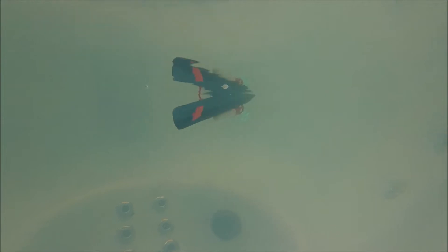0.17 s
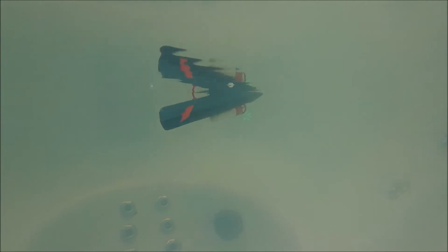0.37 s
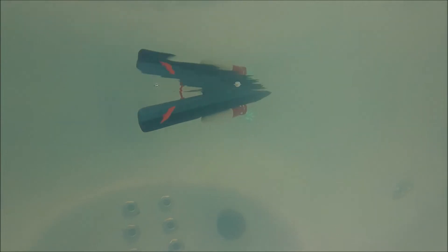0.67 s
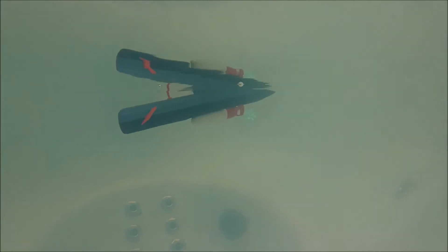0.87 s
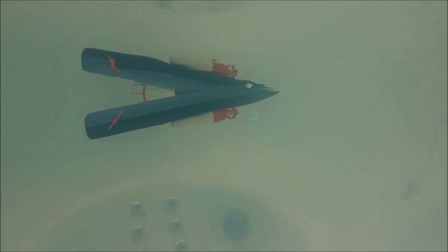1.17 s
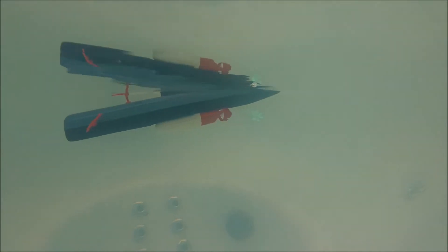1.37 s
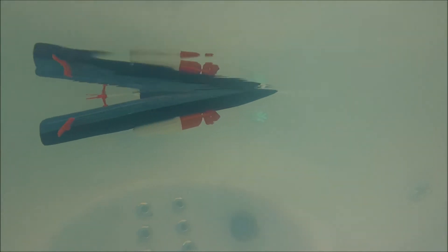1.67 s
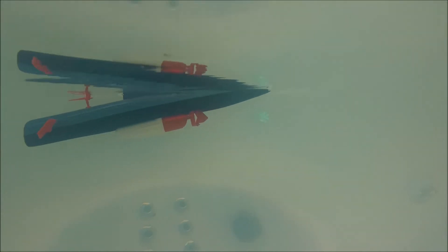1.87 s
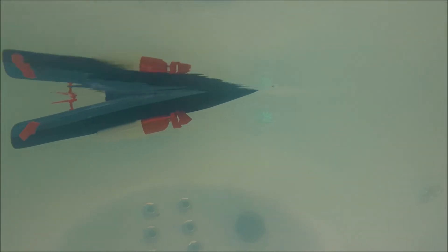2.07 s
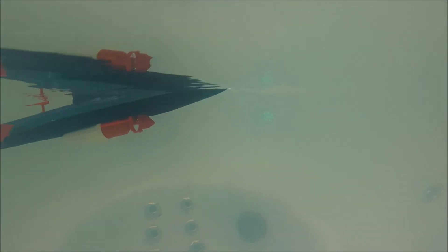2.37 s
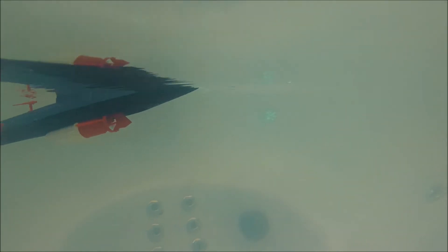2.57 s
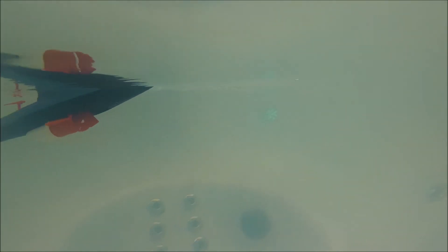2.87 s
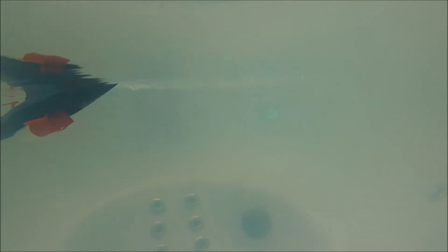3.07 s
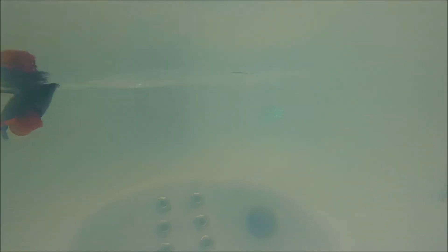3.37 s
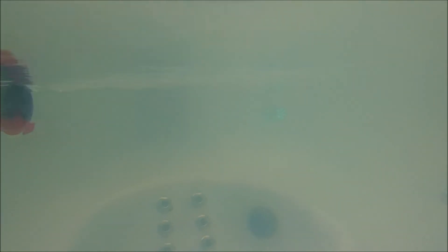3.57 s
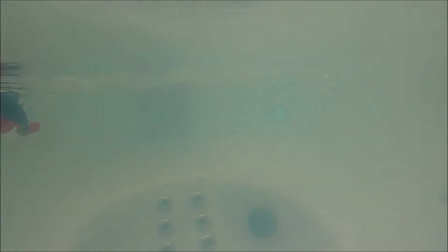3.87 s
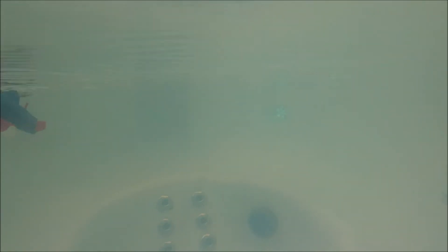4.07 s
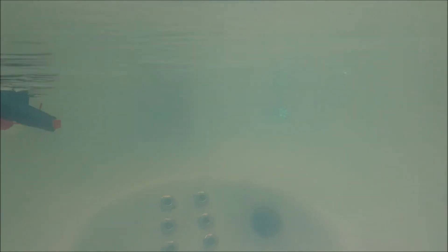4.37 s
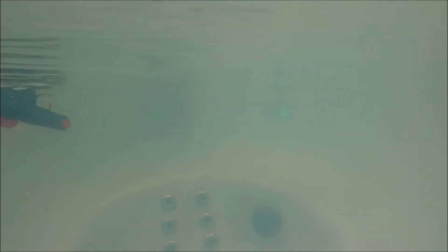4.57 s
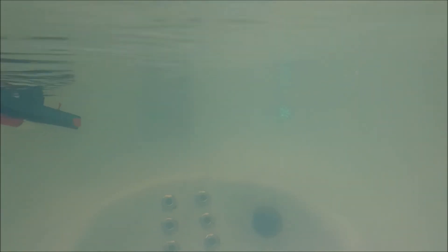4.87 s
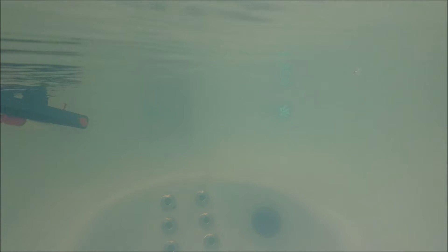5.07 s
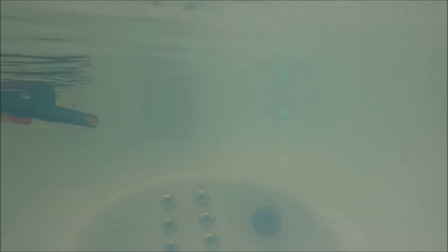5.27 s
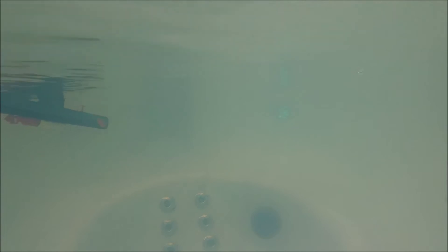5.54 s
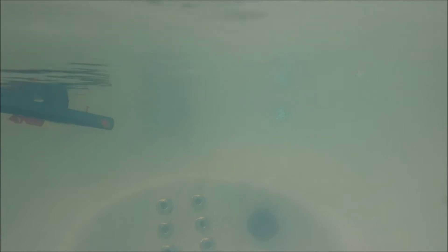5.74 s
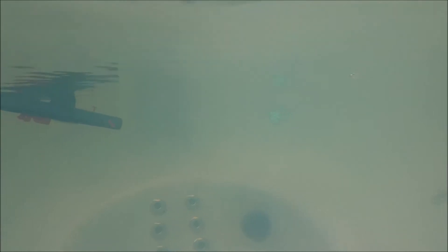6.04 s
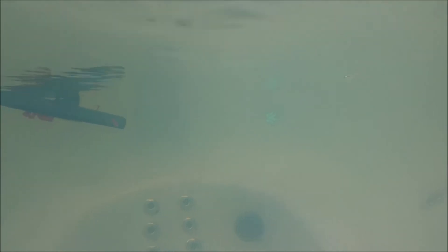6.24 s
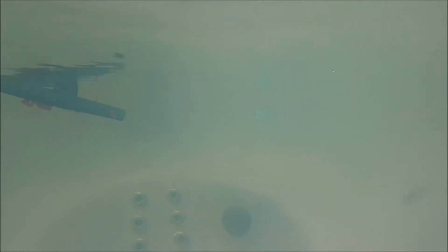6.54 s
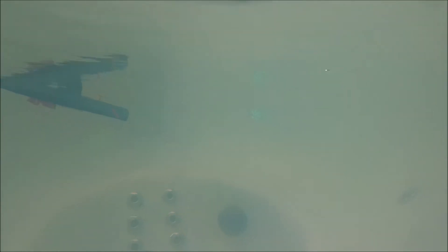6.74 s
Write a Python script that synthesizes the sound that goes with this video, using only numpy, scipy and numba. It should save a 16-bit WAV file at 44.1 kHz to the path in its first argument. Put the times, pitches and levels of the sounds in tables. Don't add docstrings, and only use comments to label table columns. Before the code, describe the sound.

Underwater, a small geared motor buzzes with a ringing, wavering nasal whine over faint low surges, then a few knocks and bubbles snap close by.

```python
import sys
import numpy as np
from scipy import signal
from scipy.fft import rfft, irfft, next_fast_len
from scipy.io import wavfile
from scipy.ndimage import uniform_filter1d
from numba import njit

SR = 44100
rng = np.random.default_rng(int(sys.argv[2]) if len(sys.argv) > 2 else 0)


def wav_record(signal):
    frames = np.transpose(np.atleast_2d(signal))
    bounded = np.clip(frames, -1, 1)
    quanta = np.round(bounded * 32767).astype(np.int16)
    wavfile.write(sys.argv[1], SR, quanta)


def elevation(decibels):
    levels = np.asarray(decibels, float)
    return 10 ** (levels / 20)


N = 304554
T = np.arange(N) / SR
BLOCK = 64
SLOW = np.arange(N // BLOCK + 2) * BLOCK / SR
FRAME = 1024

# (time [s], place [0 far off, 1 passing, 2 at the wall])
PATH = [
    (0, 0.4),
    (.8, 0.36),
    (1.5, 0.9),
    (2.6, 1.11),
    (3.4, 1.45),
    (4, 1.68),
    (4.6, 2),
    (5.6, 2.5),
    (6.9, 1.86),
]


def level(x, db):
    return x * elevation(db) / np.sqrt(np.mean(x ** 2))


def steady(x, span_s):
    k = int(span_s * SR)
    power = uniform_filter1d(uniform_filter1d(x ** 2, k), k)
    return x / np.sqrt(power + 1e-18)


def walk(rate, t):
    coarse = uniform_filter1d(np.repeat(rng.standard_normal(N // 400), 8), 12)
    return np.interp(t * rate * 8, np.arange(len(coarse)), coarse) / coarse.std()


def bell(s, half_s):
    return np.exp(-.5 * ((SLOW - s) / half_s) ** 2)


def curves(table, at):
    first, *columns = np.transpose(table)
    return [np.interp(T, SLOW, np.interp(at, first, c)) for c in columns]


def coloured(x, points):
    hz, db = np.transpose(points)
    size = next_fast_len(N)
    f = np.fft.rfftfreq(size, 1 / SR) + 1
    gain = elevation(np.interp(np.log(f), np.log(hz), db, -99, -99))
    return irfft(rfft(x, size) * gain, size)[:N]


def ring(x, hz, width):
    return signal.lfilter(*signal.iirpeak(hz, hz / width, fs=SR), x)


def ping(start, db, hz, t60, rise_ms):
    t = np.arange(int(t60 * SR)) / SR
    rise = (1 - np.exp(-t * 1000 / rise_ms)) ** 2
    shape = rise * np.exp(-np.log(1000) * t / t60)
    out, i = np.zeros(N + len(t)), int(start * SR)
    out[i:i + len(t)] = elevation(db) * shape / shape.max() * np.sin(2 * np.pi * hz * t)
    return out[:N]


def rattle():
    # (time [s], size [dB])
    slips = [(1.1276, 6.5), (1.268, 5), (1.4063, 2), (1.5358, 7), (1.7288, 4.5), (2.0009, 7), (2.1201, 5),
             (2.2247, -3.5), (2.3455, 4), (2.4187, 8), (2.584, 3), (2.7027, 2), (3.0092, 3), (3.098, -2),
             (3.295, 3), (3.453, 8), (3.5312, 0.5), (3.738, 7.5), (3.8056, 5.5), (4.016, 4), (4.258, 10.5),
             (4.5623, 7.5), (4.6308, 6), (4.676, 5), (4.7117, 4.5), (5.2065, 6.5), (5.685, -1.5),
             (5.7773, 3.7), (6.078, 3)]
    slip_s = 0.0084
    tooth_db = 2.7 * np.minimum(rng.exponential(size=N), 3)
    ticks = (rng.random(N) < 500 / SR) * rng.standard_normal(N) * elevation(tooth_db)
    slips_db = sum(db * np.sign(SLOW - s) * np.exp(-np.abs(SLOW - s) / slip_s) for s, db in slips)
    chatter_db = 1.4 * walk(45, SLOW) + 0.61 * walk(11, SLOW) + slips_db
    return (level(ticks, -2.5) + rng.standard_normal(N)) * np.interp(T, SLOW, elevation(chatter_db))


@njit
def glide(x, hz, width, gain, block):
    y, b, l = np.empty(len(x)), np.zeros(2), np.zeros(2)
    g = k = 0.
    for i in range(len(x)):
        j, part = i // block, (i % block) / block
        if part == 0:
            g, k = np.tan(np.pi * hz[j] / SR), width / hz[j]
        u = x[i]
        for n in range(2):
            v = (b[n] + g * (u - l[n])) / (1 + g * (g + k))
            b[n], l[n], u = 2 * v - b[n], l[n] + 2 * g * v, k * v
        y[i] = u * (gain[j] + part * (gain[j + 1] - gain[j]))
    return y


def modes_of(drive, modes, drift_db, wander, slide=0):
    place, out = np.interp(SLOW, *np.transpose(PATH)), 0
    for k, (hz, width, *place_db) in enumerate(modes):
        centre = hz * (1 + wander * walk(1.5, SLOW) + slide * (place - 1))
        gain_db = np.interp(place, range(3), place_db) + drift_db * walk(3.377, SLOW)
        sign = (-1) ** k
        out = out + glide(drive, centre, 1.42 * width, sign * elevation(gain_db), BLOCK)
    return out


def family(drive, modes, db, drift_db, wander, slide=0):
    return steady(modes_of(drive, modes, drift_db, wander, slide), 0.097) * elevation(db)


def submarine():
    # (centre [Hz], width [Hz], far off [dB], passing [dB], at the wall [dB])
    hull = [(934, 44, 2.5, 2.5, -3.5), (1015, 35, -9, -17, 1.5), (1073.6, 46, -11, -9.5, -5.5),
            (1153.4, 54, -8, -0.5, -4.5), (1266, 46, -2, -0.5, -5)]
    tub_first = [(1325, 27.5, -0.5, 6, 1), (1383, 40, -10, -13.5, -18), (1513, 140, -22, -25, -6.5)]
    tub_second = [(1597, 30, -1, 0.5, -1.5), (1516, 83, -10.5, -11.5, -8.5), (1800, 41, -2.5, -17.5, -24)]
    tub_upper = [(1853, 80, 5.5, -4, -22.5), (1970, 43, -8, -4, -0.5), (2046, 49, 4.5, -1.5, -2),
                 (2115, 45, -22.5, -4.5, 0), (2194, 43, -23, -11, -15.5)]
    fine = [(2430, 37, -3, -17, 0.5), (2569, 54, 0.5, 2.5, -1), (2685, 66, 0, -1, -11.5),
            (2896, 78, -10, -9.5, -1.5), (3083, 89, -0.5, -1.5, -4.5), (3430, 170, -4.5, -2, -5.5),
            (3810, 130, -10, -2.5, -4.5), (4100, 70, 10, -3, 3.5), (4280, 79, -5.5, -8, -5)] + [(4900, 32, -36, 1, -17), (4930, 96, -7, -10, -11.5),
                               (5200, 86, 0.5, -6, -6.5), (5410, 60, -2.5, -1, -3.5),
                               (5820, 55, 3.5, -2, -11.5), (5950, 70, -10.5, -10.5, -4),
                               (6450, 56, -7.5, -7.5, -9), (6860, 160, -14.5, -9, -19.5),
                               (7110, 70, -2, -16.5, -6), (7355, 170, -14, -6.5, -11.5),
                               (7570, 46, -3, -11.5, -11.5)]
    hum = [(416, 49, -74, -58, -78.5), (325, 43, -79.5, -68, -72), (757, 64, -65.5, -64, -69.5)]
    # (time [s], level [dB])
    motor_load = [(0.0, -51), (1.29, -46), (1.59, -47), (2.8, -43.5), (2.94, -45.5), (3.59, -46),
                  (4.32, -47), (5.44, -48.5), (6.34, -48), (6.57, -44.5), (6.73, -47.5), (6.9, -43)]
    # (place [0-3], first [dB], second [dB], upper [dB])
    pickup = [(.4, -0.5, -21, -8), (.85, -2.5, -17.5, -10), (1.2, -1, -4, -6.5), (1.5, 3.5, -2, -1),
              (2, -3, -13, -1.5), (3, -3.5, -1.5, -1)]
    # (time [s], change [dB])
    falters = [
        (1.46, 1.5),
        (4.15, 2),
        (4.23, -2),
        (4.33, -0.5),
        (4.461, -2.5),
        (5.36, -3),
        (5.62, 0.5),
        (5.96, 1),
        (6.67, 2),
        (6.79, 1.5),
    ]
    # (frequency [Hz], density [dB per Hz])
    whir_points = [(700, -17), (1200, 6.5), (2300, 1.5), (2800, -9.5), (4000, -6.5), (6200, -6.5),
                   (7700, -18)]
    falter_half_s = 0.016

    place = np.interp(SLOW, *np.transpose(PATH))
    load, = curves(motor_load, SLOW)
    first, second, upper = curves(pickup, place)
    falter = np.interp(T, SLOW, sum(db * bell(s, falter_half_s) for s, db in falters))
    tub = load + 2.5 * falter
    drive = rattle()
    out = family(drive, hull, load + falter + 0.3, drift_db=1.5, wander=0.0007)
    out = out + family(drive, tub_first, tub + first + 1.2 * walk(5, T), drift_db=.7, wander=0.001)
    out = out + family(drive, tub_second, tub + second + 1.5 * walk(5, T), drift_db=1.2, wander=0.001)
    out = out + family(drive, tub_upper, tub + upper + 0.8 * walk(5, T), drift_db=1.8, wander=0.0015)
    out = out + family(drive, fine, -58, drift_db=1.8, wander=.003, slide=.01)
    out = out + elevation(20.5) * modes_of(drive, hum, drift_db=.8, wander=0.0018)
    whir = coloured(0.62 * drive + rng.standard_normal(N), whir_points)
    return out + level(whir, -52.5 - 3.5)


def waves(table, calm_db):
    power = elevation(2 * calm_db) + sum(elevation(2 * db) * bell(s, half_s) for s, db, half_s in table)
    return np.interp(T, SLOW, np.sqrt(power))


def water():
    # (time [s], level [dB], half length [s])
    slosh_waves = [(0, -50, 0.03), (.29, -49.5, .08), (.76, -49, 0.063), (1.18, -48, 0.053),
                   (1.68, -55.5, .06), (1.9, -51.5, .1), (2.48, -54, 0.11), (3.36, -45.5, 0.077),
                   (4.96, -55.5, 0.094), (5.63, -53, 0.059), (5.9, -51, 0.068), (6.2, -45, 0.064),
                   (6.46, -40, 0.054), (6.72, -43, 0.052)]
    surge_waves = [(.1, -57, 0.058), (.98, -53, 0.055), (1.36, -57.5, 0.081), (1.66, -58, 0.052),
                   (2.1, -50, 0.034), (2.92, -51, 0.043), (3.4, -56.5, 0.11), (4.3, -55.5, 0.13),
                   (4.6, -60, .08), (5.16, -53, 0.06), (5.5, -54, 0.066), (5.86, -48, .07),
                   (6.35, -47, .15), (6.62, -45.5, .07), (6.9, -46, 0.039)]
    # (time [s], peak [dB], pitch [Hz], t60 [s])
    thumps = [
        (0.741, -41.5, 58, 0.16),
        (1.664, -37, 62, 0.065),
        (2.05, -40, 40, .12),
        (3.416, -36.5, 55, 0.075),
        (5.901, -44, 54, 0.16),
    ]
    # (frequency [Hz], density [dB per Hz])
    hiss_points = [(29, -33), (50, -2.5), (172, -8), (370, -11), (657, -16), (827, -17.5), (900, -5.5),
                   (1250, -61.5)]
    slosh = steady(ring(ring(rng.standard_normal(N), 42, 20), 42, 20), 0.24)
    slosh = slosh * waves(slosh_waves, calm_db=-57.5) * elevation(-5.0)
    surge = steady(ring(ring(rng.standard_normal(N), 10, 12), 10, 12), 0.21)
    surge = surge * waves(surge_waves, calm_db=-59.5) * elevation(0.7)
    bumps = sum(ping(*row, rise_ms=0.93) for row in thumps)
    hiss = level(coloured(rng.standard_normal(N), hiss_points), -57)
    return slosh + surge - bumps + hiss


def clicks():
    # (time [s], peak [dB], pitch [Hz], t60 [s])
    knocks = [(6.2995, -28.5, 1210, 0.016), (6.300, -35.5, 3080, 0.018), (6.3005, -44, 2100, .015),
              (6.3, -43, 4200, 0.013), (6.364, -34, 675, 0.0071), (6.500, -43, 5830, 0.0087),
              (6.5547, -7.5, 1180, 0.0072), (6.5592, -16.5, 990, 0.048), (6.5606, -23, 1260, 0.013),
              (6.638, -27.5, 990, 0.015), (6.767, -21, 1426, 0.031), (6.766, -26, 1075, 0.031)]
    bubbles = [
        (6.305, -42, 880, 0.028),
        (6.584, -37, 1100, 0.046),
        (6.585, -37.5, 2136, 0.031),
        (6.6352, -18, 1434, 0.014),
        (6.6405, -20.5, 1324, 0.028),
        (6.723, -31.5, 1120, 0.027),
        (6.753, -32, 1060, .03),
        (6.812, -32, 1143, .05),
    ]
    # (time [s], level [dB])
    snap_times = [
        (6.2996, -50),
        (6.302, -49),
        (6.5006, -45),
        (6.5548, -21),
        (6.5595, -53),
        (6.5846, -55),
        (6.7676, -54),
        (6.8116, -54),
    ]
    # (centre [Hz], width [Hz], level [dB])
    crack_modes = [(2100, 410, -8.5), (3600, 290, 5.5), (4250, 640, 6.5), (5500, 1100, 0), (7140, 720, -28)]
    snaps = np.zeros(N)
    for s, db in snap_times:
        snaps[int(s * SR)] += elevation(db) * 10
    crack = sum(elevation(db) * ring(ring(snaps, hz, width), hz, 2.4 * width) for hz, width, db in crack_modes)
    knocking = sum(ping(*row, rise_ms=0.51) for row in knocks)
    bubbling = sum(ping(*row, rise_ms=2.1) for row in bubbles)
    return crack + knocking + bubbling


def scene():
    return (submarine() + water() + clicks())[None]


def starve(x):
    # (time [s], share of the bands lost [0-1])
    thin_moments = [(.09, .2), (.31, .4), (.73, .3), (1.02, .25), (1.8, .4), (2.05, .25), (2.13, .3),
                    (2.3, .3), (2.38, .4), (2.55, .4), (2.74, .35), (3.47, .3), (3.68, .35), (4.47, .35),
                    (4.6, .3), (5.58, .35), (5.635, .6), (5.77, .3), (5.9, .3), (5.95, .25), (6.2, .35)]
    _, t, spec = signal.stft(x, SR, nperseg=FRAME, noverlap=FRAME // 2)
    band = np.arange(len(spec)) // 5
    for s, share in thin_moments:
        frames = np.abs(t - s) < FRAME / SR * (.15 + .8 * share)
        energy = np.sum(np.abs(spec[:, frames]) ** 2, axis=1)
        power = np.log(np.bincount(band, energy) + 1e-18)
        weak = power - uniform_filter1d(power, 9)
        lost = weak < np.quantile(weak[2:35], 1.4 * share)
        lowest = 1 if share > .5 else 11
        spec[np.ix_(lost[band] & (band > lowest), frames)] *= elevation(-36 * share)
    return signal.istft(spec, SR, nperseg=FRAME, noverlap=FRAME // 2)[1][:N]


def roll_off(x):
    return signal.sosfilt(signal.butter(12, 8760, fs=SR, output="sos"), x)


def record(dry):
    top_hz, end_s = 7610, 6.906
    treble = signal.sosfiltfilt(signal.butter(2, 5000, "high", fs=SR, output="sos"), dry)
    pulse = 0.35 * np.cos(2 * np.pi * np.arange(N) / FRAME - 2.8)
    x = starve((dry + treble * pulse)[0])
    low = signal.sosfiltfilt(signal.ellip(9, .1, 40, top_hz, fs=SR, output="sos"), x)
    loud = np.clip(uniform_filter1d(np.abs(x), 200) / .075 - 1, 0, 1)
    x = low + (x - low) * loud * elevation(-8)
    x = x + elevation(-99) * rng.standard_normal(N)
    x = x * np.clip((end_s - T) / .002, 0, 1)
    return roll_off(x[None])


dry = scene()
out = record(dry)
wav_record(out)
```